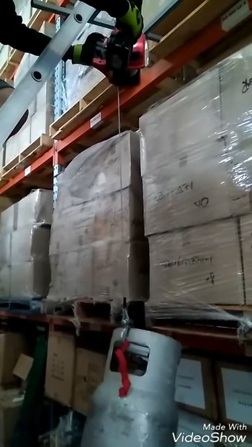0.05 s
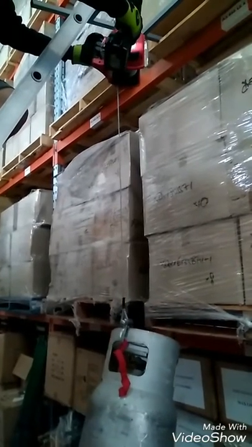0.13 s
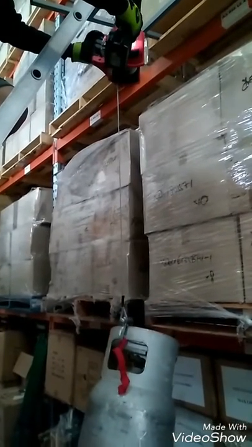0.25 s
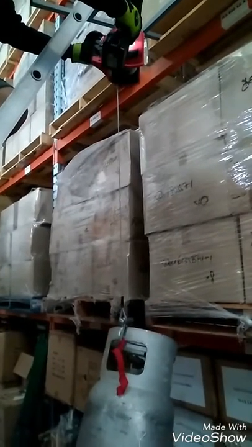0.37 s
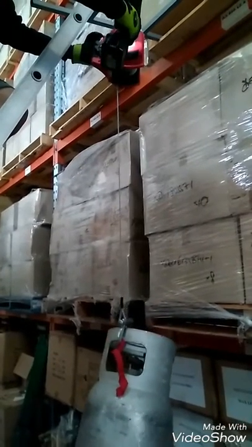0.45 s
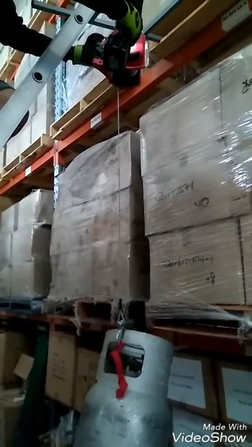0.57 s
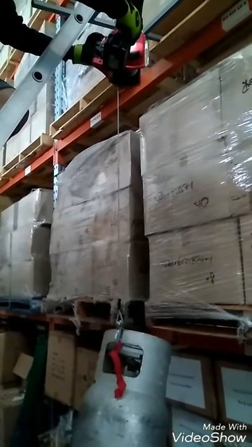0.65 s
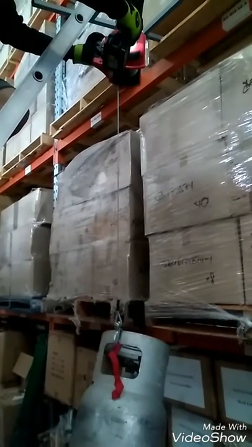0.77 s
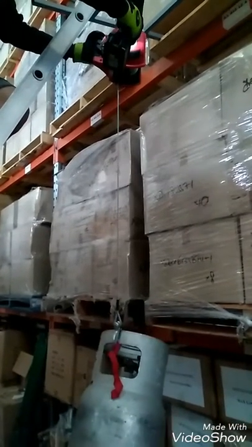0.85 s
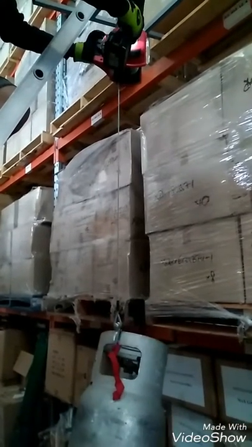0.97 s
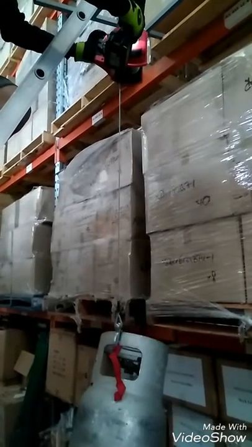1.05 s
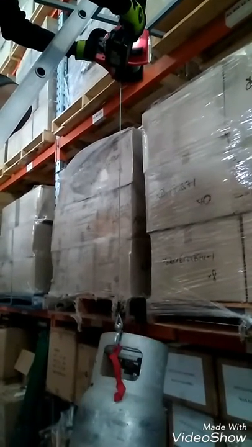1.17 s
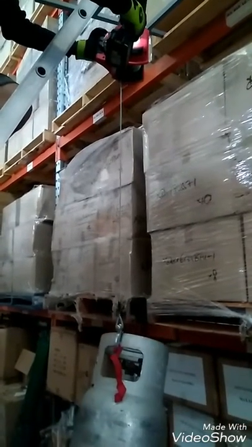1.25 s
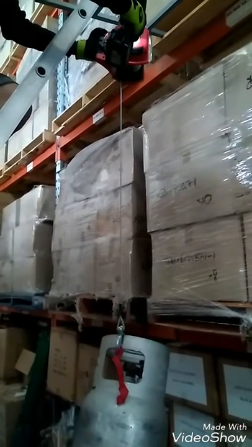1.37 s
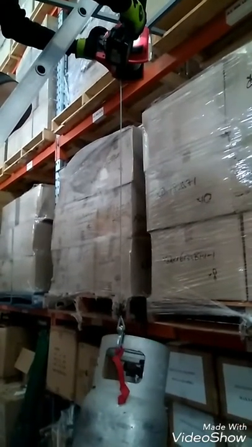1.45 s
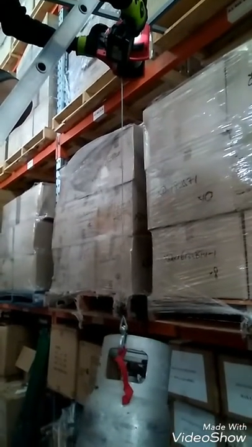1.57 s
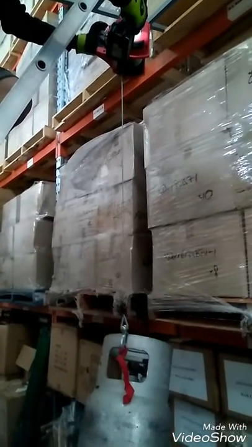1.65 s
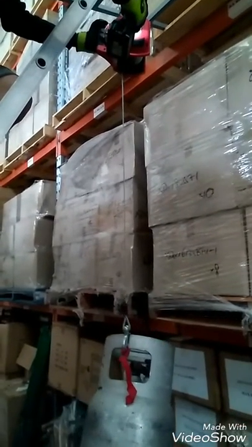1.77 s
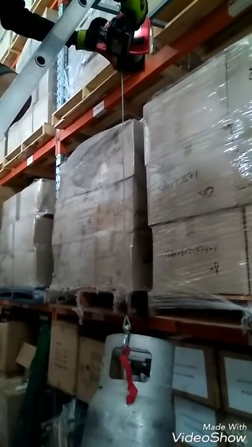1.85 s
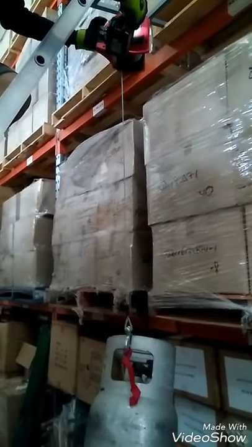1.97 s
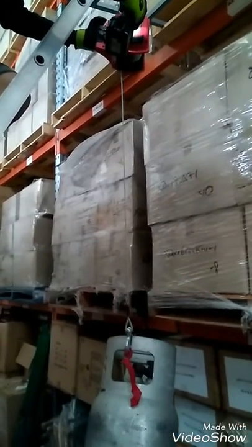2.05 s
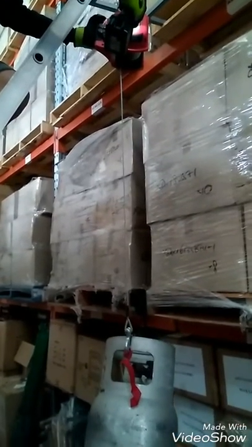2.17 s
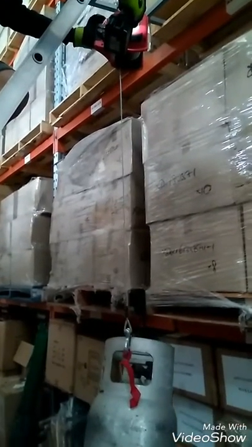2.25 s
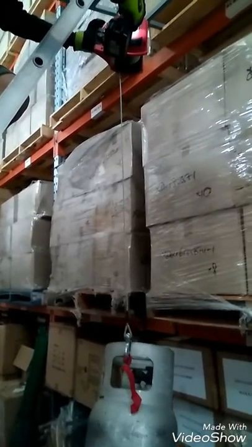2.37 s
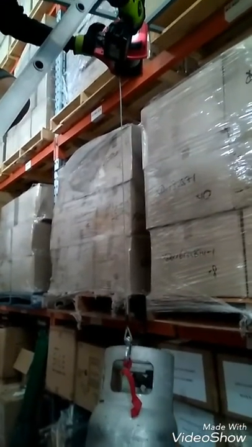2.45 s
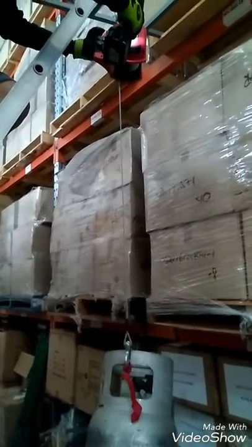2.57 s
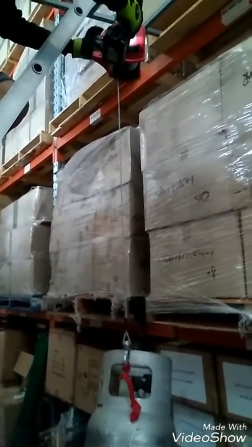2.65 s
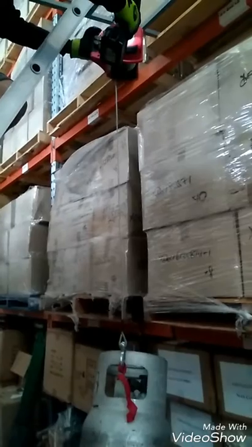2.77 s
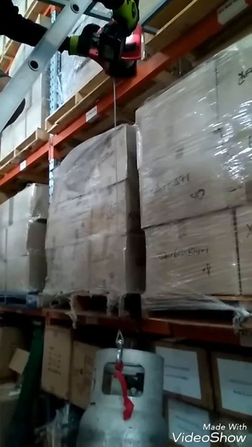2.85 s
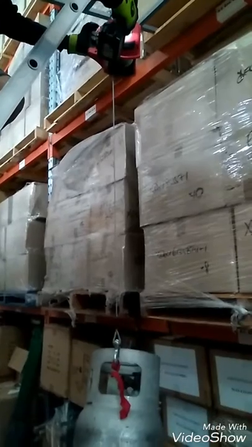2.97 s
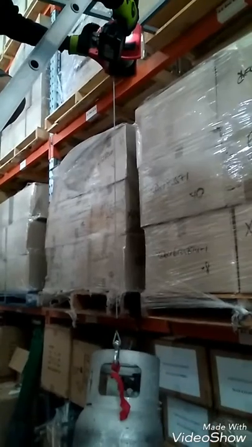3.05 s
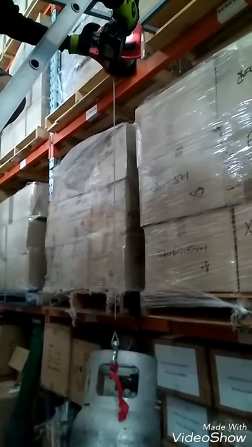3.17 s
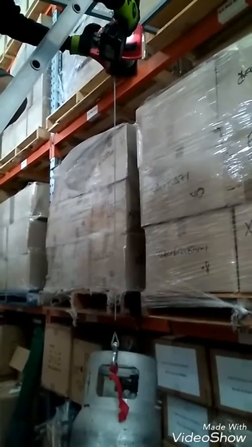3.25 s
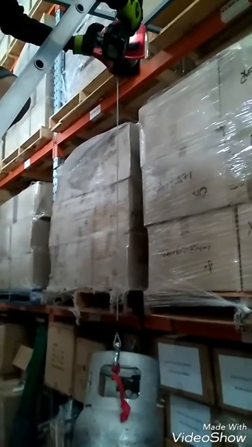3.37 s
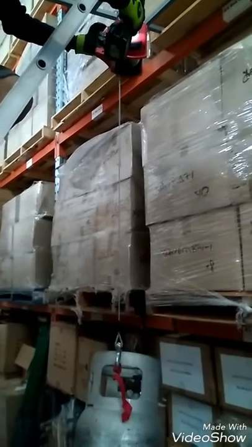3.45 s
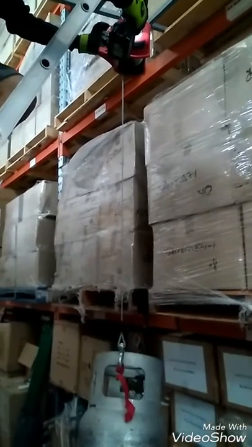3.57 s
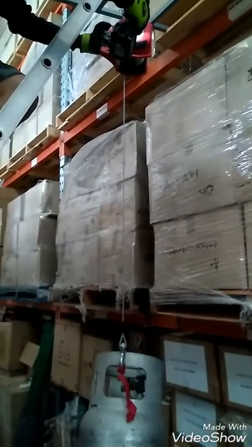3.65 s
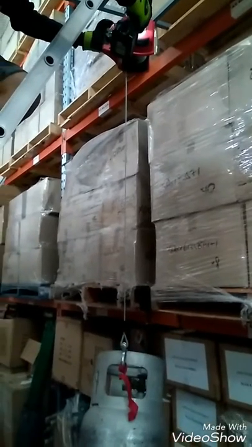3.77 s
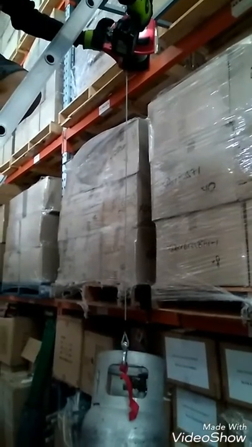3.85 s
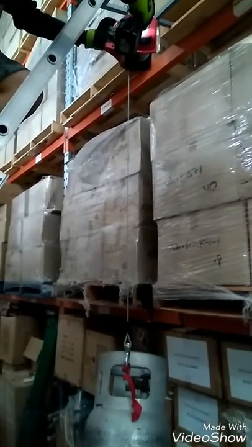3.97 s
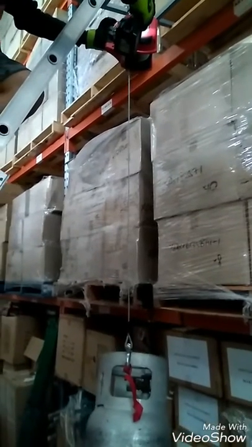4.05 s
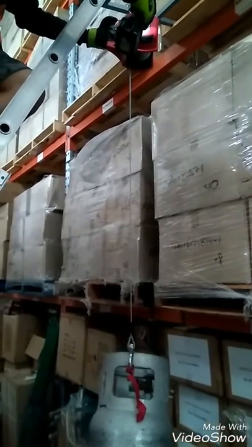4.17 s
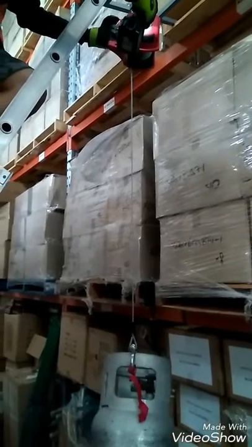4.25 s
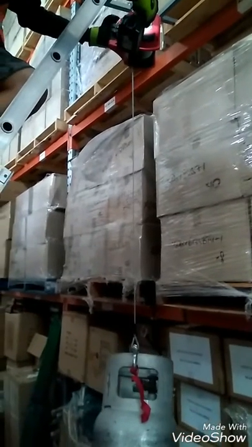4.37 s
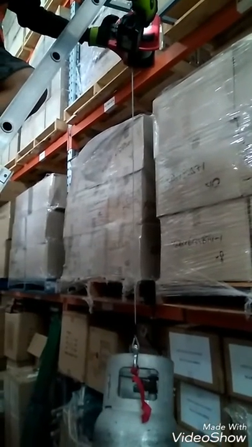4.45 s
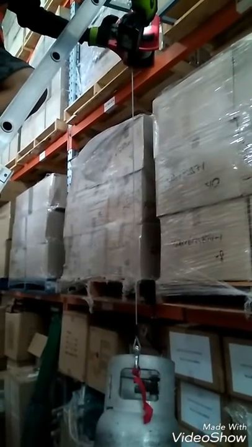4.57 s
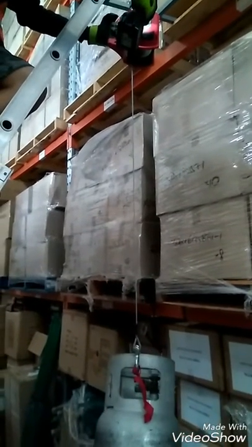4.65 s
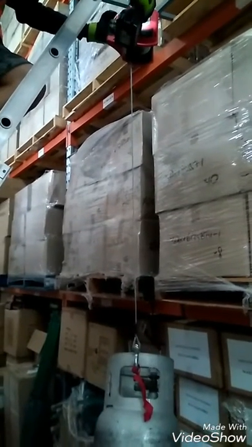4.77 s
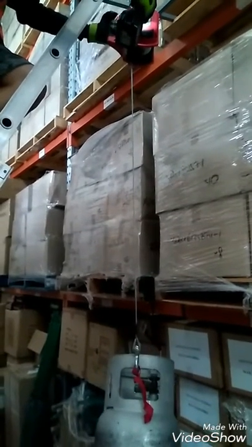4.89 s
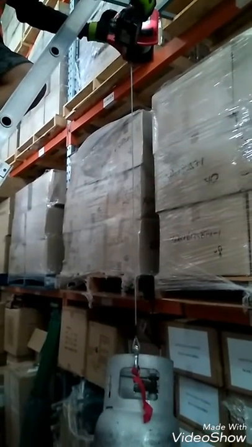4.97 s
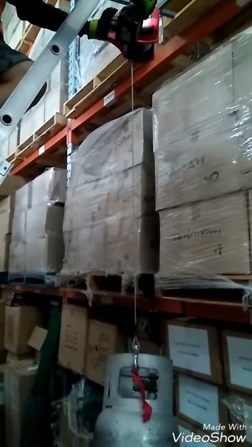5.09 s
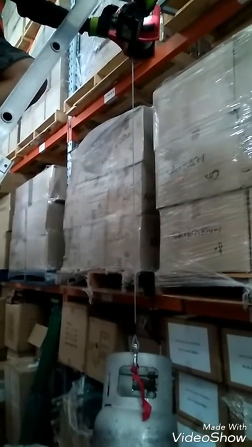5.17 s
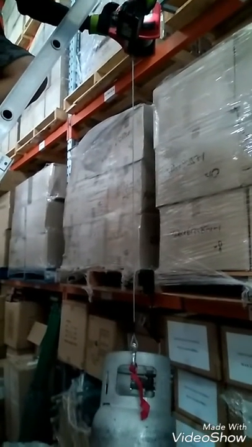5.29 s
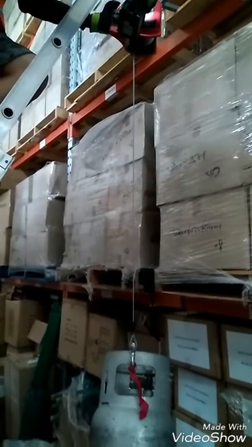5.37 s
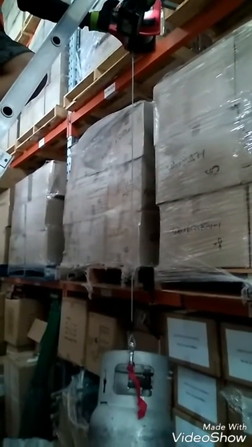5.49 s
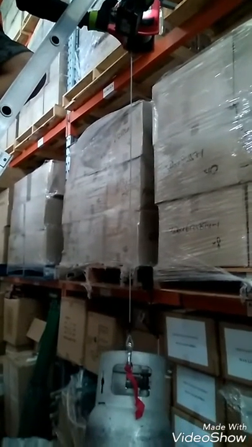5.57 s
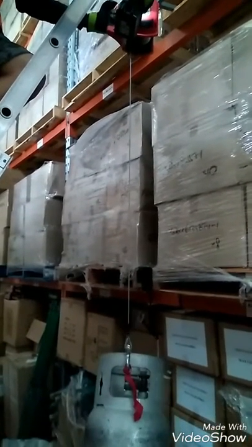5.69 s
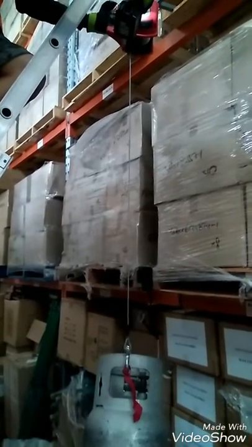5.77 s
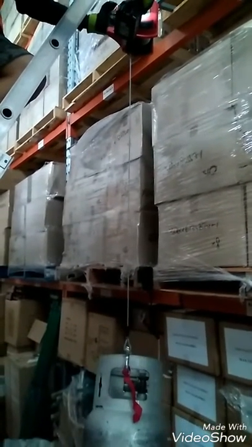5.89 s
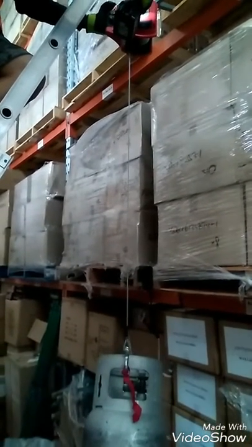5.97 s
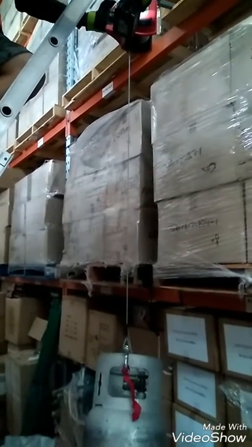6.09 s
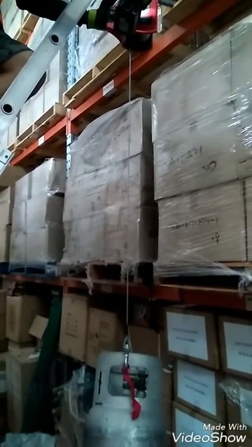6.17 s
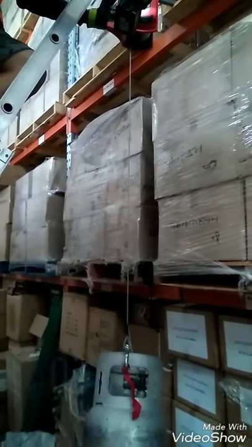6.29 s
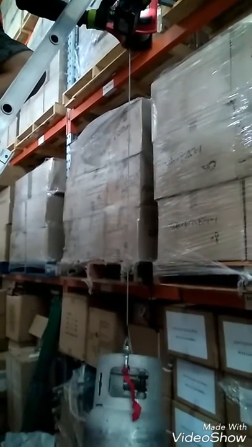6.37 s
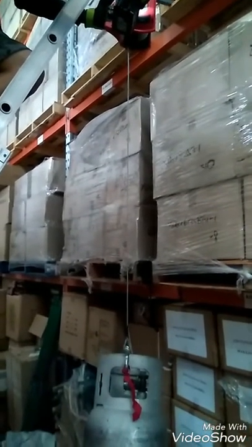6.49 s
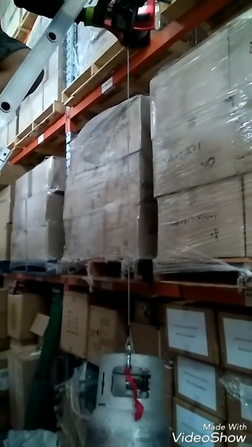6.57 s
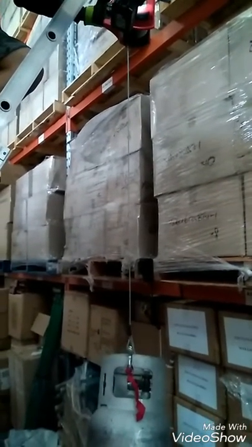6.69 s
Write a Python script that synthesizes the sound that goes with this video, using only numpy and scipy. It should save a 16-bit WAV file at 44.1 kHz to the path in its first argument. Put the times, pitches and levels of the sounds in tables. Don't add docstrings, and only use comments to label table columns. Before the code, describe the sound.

Harsh, rattling drill whine stops for a moment, creeps up again, then runs steadily on a winch, surging faster midway with sharp clicks.

```python
import sys
import numpy as np
from scipy import signal
from scipy.fft import rfft, irfft, next_fast_len
from scipy.io import wavfile
from scipy.ndimage import uniform_filter1d

SR = 44100
rng = np.random.default_rng(int(sys.argv[2]) if len(sys.argv) > 2 else 0)


def volts_from_decibels(level):
    exponent = np.asarray(level, float) / 20
    return 10 ** exponent


def wav_out(sig):
    wavfile.write(sys.argv[1], SR, np.round(np.clip(np.atleast_2d(sig).T, -1, 1) * 32767).astype(np.int16))


N = 296793
SIZE = next_fast_len(N)

# (time [s], speed [turns/s])
SHAFT_SPEED = [(0.8, 200), (0.86, 224), (1.22, 223.5), (1.27, 247.6), (1.31, 265.8), (1.37, 273.2),
               (1.5, 269.8), (3.3, 269.7), (3.37, 273.6), (3.48, 295.2), (3.63, 300.8), (4.24, 298.6),
               (4.4, 286), (4.47, 276.5), (4.6, 275.2), (5.6, 275.4), (6.3, 274.7), (6.72, 273.6)]
# (time [s], effort headed for [dB], lag [s])
SQUEEZE = [
    (0.063, -36.5, .075),
    (.403, -19, 0.014),
    (.505, -10.5, 0.018),
    (.72, -5, 0.037),
    (.815, 2, 0.017),
    (.89, 0, 0.053),
]
TRIGGER_SPEEDS = [223, 270, 275, 300]
# (multiple of shaft speed, then level at each trigger speed [dB])
GEARS = [(1.283, -50, -46, -48, -50), (1.927, -52, -47, -42, -60), (2.47, -65, -47.5, -48, -42.5),
         (10.405, -37, -46.5, -42, -48), (31.005, -49, -40, -39, -40), (51.16, -46, -51, -49.5, -58)]
# (multiple of shaft speed, then level at each trigger speed [dB])
BARS = [(10, -55, -42, -44.5, -41), (20, -52, -46, -47.5, -45), (23, -60, -47, -50, -51),
        (24, -60, -50, -46.5, -41), (26, -54, -46.5, -44.5, -41), (27, -55, -46.5, -49, -50),
        (28, -59, -46, -48.5, -46), (29, -49, -45, -51, -43), (30, -50, -50, -47.5, -36),
        (35, -51, -47.5, -45, -61), (38, -46, -45, -45, -48), (39, -40, -45, -42, -46),
        (40, -42, -36.5, -46, -40), (41, -43, -45, -45.5, -44), (42, -48, -51.5, -51.5, -48),
        (49, -46, -52.5, -51.5, -55)]
# (shaft speed [turns/s], level [dB])
MAIN_MESH = [(224, -42), (245, -29), (270, -30.5), (275, -32), (288, -33), (300, -29.5)]
PLANETS = [(.133, .06), (.203, .12), (.336, .06), (.469, .06), (.664, .06), (9.67, .2)]
# (frequency [Hz], level per Hz [dB])
RATTLE_COLOUR = [(60, -70), (125, -35.5), (175, -18), (350, -16), (740, -10.5), (1200, -5.5), (1700, -7.5),
                 (2300, -8), (4000, -12), (6500, -8), (10800, -8), (12500, -15), (14300, -14),
                 (16000, -15.5)]
# (frequency at first [Hz], frequency once the cable has run out [Hz], width [Hz], level over the rattle [dB])
RESONANCES = [(497, 520, 35, 7.5), (740, 730, 55, 3), (926, 890, 38, 7.5), (984, 1010, 114, 12),
              (1125, 910, 20, 9), (1213, 1214, 28, 4.5), (1356, 1405, 83, 11.5), (1457, 1472, 80, 11),
              (1555, 1600, 45, 4.5), (1800, 1820, 41, 6.5), (1994, 2080, 70, 6.5), (2105, 1600, 49, 4),
              (6600, 6600, 120, 4)]
# (level when lifting [dB], share of effort, rise per 10% more speed [dB])
RATTLE_LAYERS = [
    (-23, 1.02, 1.38),
    (-31, 0.94, 1.3),
    (-24, 0.94, 0.85),
]
FLAT_OUT = [0.1, 1, 1.5]
# (time [s], level [dB], ring [Hz])
CLICKS = [(0.412, -41, 9000), (0.76, -34, 4000), (3.81, -16, 6600), (3.86, -17, 6600), (4.1, -23, 6600)]
# (frequency [Hz], level per Hz [dB])
VENTILATION = [(60, -56), (120, -31), (200, -11), (400, -9.5), (1240, -14), (2500, -16.5), (5000, -24),
               (10300, -26), (15900, -40)]
# (frequency [Hz], level [dB])
DISTANT_HUM = [(398.4, -56.5), (802.1, -56), (1001, -97), (1351, -59), (1803, -60.5)]
# (frequency [Hz], level about the neighbours' [dB])
FAINTEST = [(1500, -30), (3000, -10), (9000, -9), (11500, -7), (12500, -3.5), (13500, -.5), (14500, 2),
            (15200, 3.8), (15700, 6), (15800, 30)]


def evened(x):
    return x / np.sqrt(np.mean(x ** 2) + 1e-20)


def read(points, hz):
    f, value = np.transpose(points)
    return np.interp(np.log(hz + 1), np.log(f + 1), value)


def curve(s, value):
    return np.interp(np.arange(N) / SR, s, value)


def drift(per_s):
    knots_per_s = 400
    knots = rng.standard_normal(int(N / SR * knots_per_s))
    b, a = signal.butter(N=2, Wn=min(per_s, 190) / (knots_per_s / 2))
    smooth = signal.filtfilt(b, a, knots, padtype="even", padlen=300)
    return curve(np.arange(len(knots)) / knots_per_s, evened(smooth))


def shaped(x, gain):
    return irfft(rfft(x, SIZE) * gain, SIZE)[:N]


def shaft_speed():
    return curve(*np.transpose(SHAFT_SPEED))


def effort_db():
    t = np.arange(N) / SR
    effort = np.full(N, -2.5)
    for s, db, lag in SQUEEZE:
        gap = effort[round(s * SR)] - db
        effort = np.where(t < s, effort, db + gap * np.exp(-np.maximum(t - s, 0) / lag))
    return effort


def whine(turns):
    speed = shaft_speed()
    lines = np.zeros(N)
    for order, *db in GEARS + BARS:
        waver_db = min(1 + order / 4, 2.5) * drift(14)
        level = np.interp(speed, TRIGGER_SPEEDS, volts_from_decibels(np.array(db))) * volts_from_decibels(waver_db)
        wobble = .35 * drift(25) + .45 * (10 < order < 11) * drift(90)
        lines += level * np.cos(2 * np.pi * (order * turns + rng.random()) + wobble)
    return np.sqrt(2) * (lines + main_mesh(turns, speed)) * curve([.8, .86], [0, 1])


def main_mesh(turns, speed):
    order = 30.34
    level = volts_from_decibels(np.interp(speed, *np.transpose(MAIN_MESH)) + 1.8 * drift(14) + 1.2 * drift(2))
    orbit = .35 * np.cos(2 * np.pi * .14 * turns) + .3 * np.cos(2 * np.pi * .22 * turns)
    planet_beat = .3 * np.cos(2 * np.pi * PLANETS[1][0] * turns)
    skirt = 1 + planet_beat + .33 * (drift(170) + 1j * drift(170))
    phase = 2 * np.pi * order * turns + orbit + .4 * drift(25)
    return level * (skirt * np.exp(1j * phase)).real


def rattle(turns):
    drive = knocking(turns)
    hz = np.fft.rfftfreq(SIZE, 1 / SR)
    colour = volts_from_decibels(read(RATTLE_COLOUR, hz))
    low = 1 / (1 + (hz / 2400) ** 8)
    high = 1 / (1 + (5500 / (hz + 1)) ** 8)
    early_gain = colour * resonances(hz, 0)
    early = evened(shaped(drive, early_gain * low))
    clatter = evened(shaped(drive, early_gain * (1 - low - high)))
    hiss = evened(shaped(drive, early_gain * high))
    stiff = evened(shaped(drive, colour * resonances(hz, 1) * low))
    dull = evened(shaped(drive, colour * low))
    effort, speed = effort_db(), shaft_speed()
    late = curve([2.8, 4.4], [0, 1])
    ringing = np.clip(1.5 + .038 * effort, .25, 1)
    frame = ringing * ((1 - late) * early + late * stiff) + (1 - ringing) * dull
    faster = np.log(np.maximum(speed, TRIGGER_SPEEDS[0]) / TRIGGER_SPEEDS[1]) * 10
    faster = faster * curve([.7, .86], [0, 1])
    flat_out = np.interp(speed, TRIGGER_SPEEDS[2:], [0, 1])
    out = np.zeros(N)
    for layer, (db, share, slope), extra in zip((frame, clatter, hiss), RATTLE_LAYERS, FLAT_OUT):
        out += volts_from_decibels(db + share * effort + slope * faster + extra * flat_out) * layer
    return out


def knocking(turns):
    knocks_per_s, decay_s = 120, 0.0055
    knocks = volts_from_decibels(3.4 * np.minimum(rng.exponential(1, N), 3)) * (rng.random(N) < knocks_per_s / SR)
    bursts = signal.lfilter([1], [1, -np.exp(-1 / (decay_s * SR))], knocks)
    beat = np.ones(N)
    for order, depth in PLANETS:
        beat += depth * np.cos(2 * np.pi * order * turns + 1 / order)
    drive = rng.standard_normal(N) * (1 + 0.096 * bursts) * beat * volts_from_decibels(0.22 * drift(24))
    return patchy(drive, patchy_db=2.0)


def patchy(x, patchy_db):
    hz, _, z = signal.stft(x, SR, nperseg=1024, noverlap=768)
    patches = uniform_filter1d(rng.standard_normal(z.shape), size=2, axis=0)
    patches = evened(uniform_filter1d(patches, size=14, axis=1))
    depth_db = patchy_db * np.minimum(hz / 1800, 1)[:, None]
    return signal.istft(z * volts_from_decibels(depth_db * patches), SR, nperseg=1024, noverlap=768)[1][:N]


def resonances(hz, late):
    power = np.ones(len(hz))
    for *centre, width, db in RESONANCES:
        power += (volts_from_decibels(db) ** 2 - 1) / (1 + (2 * (hz - centre[late]) / width) ** 2) ** 2
    return np.sqrt(np.maximum(power, .01))


def clicks():
    out, t = np.zeros(N), np.arange(900) / SR
    for s, db, hz in CLICKS:
        ring = np.sin(2 * np.pi * hz * t) + 0.25 * rng.standard_normal(len(t))
        attack = np.minimum(t / 0.00065, 1)
        out[round(s * SR):][:len(t)] += volts_from_decibels(db - 60 * t / 0.054) * ring * attack
    return out


def hall():
    t = np.arange(N) / SR
    wash_gain = volts_from_decibels(read(VENTILATION, np.fft.rfftfreq(SIZE, 1 / SR)))
    out = volts_from_decibels(-50) * evened(shaped(rng.standard_normal(N), wash_gain))
    for hz, db in DISTANT_HUM:
        level = volts_from_decibels(db + 0.4 + 2.8 * drift(12))
        out += level * np.cos(2 * np.pi * hz * t + 1.7 * drift(7.5))
    return out


def scene():
    turns = np.cumsum(shaft_speed()) / SR
    return np.tile(whine(turns) + rattle(turns) + clicks() + hall(), (2, 1))


def thinned(x):
    hz, t, z = signal.stft(x, SR, "cosine", nperseg=2048, noverlap=1024)
    around = np.sqrt(uniform_filter1d(abs(z) ** 2, size=60, axis=0))
    strictness_db = 1.5 * rng.standard_normal(len(t))
    keep = abs(z) > around * volts_from_decibels(read(FAINTEST, hz)[:, None] + strictness_db)
    at = np.minimum(t * SR, N - 1).astype(int)
    strain = drift(10)[at] + effort_db()[at] / 10 + .2
    bass_edge_hz = 86 * np.floor(2.85 + .65 * strain)
    keep &= (strain < 0) | (hz[:, None] > bass_edge_hz)
    return signal.istft(z * keep, SR, "cosine", nperseg=2048, noverlap=1024)[1][:N]


def band_limit(x):
    return signal.sosfilt(signal.butter(12, 16380, fs=SR, output="sos"), x)


def record(dry):
    rounded = 1.108 * np.tanh(dry[0] / 1.092)
    bass_cut = signal.butter(N=4, Wn=110, btype="high", fs=SR, output="sos")
    mix = np.tile(thinned(signal.sosfilt(bass_cut, rounded)), (2, 1))
    return band_limit(mix)


dry = scene()
out = record(dry)
wav_out(out)
```